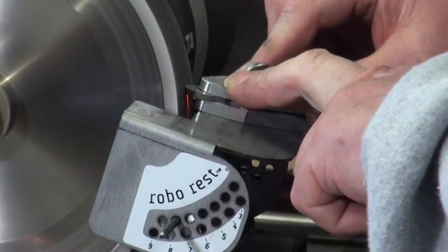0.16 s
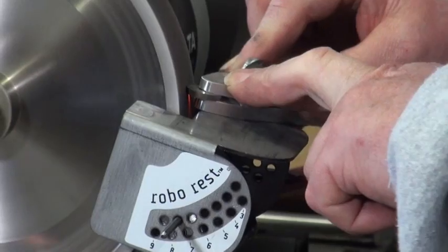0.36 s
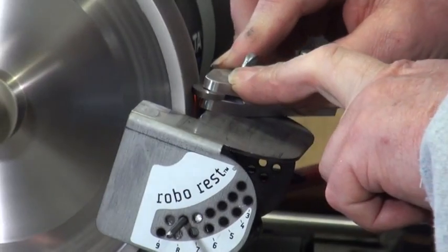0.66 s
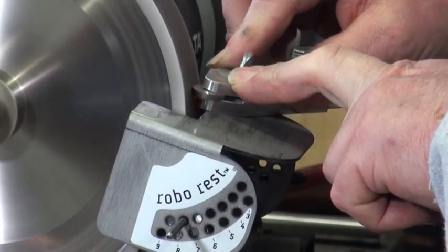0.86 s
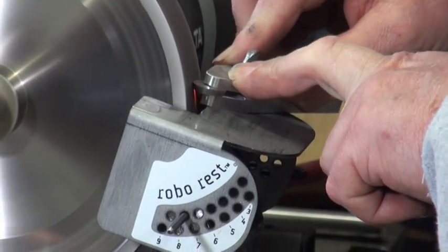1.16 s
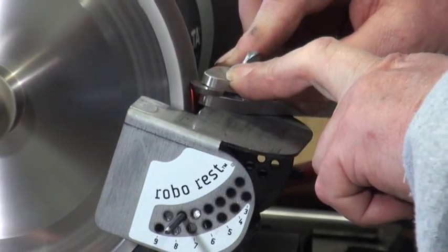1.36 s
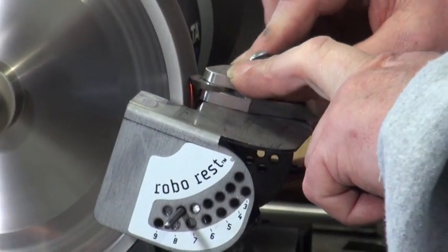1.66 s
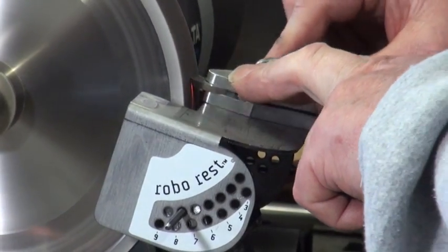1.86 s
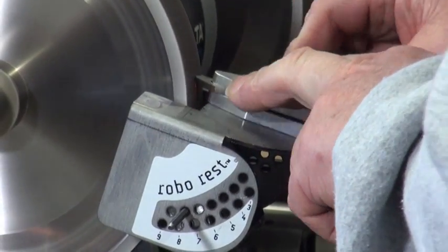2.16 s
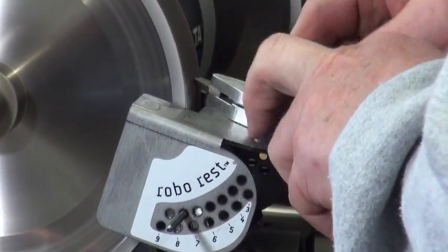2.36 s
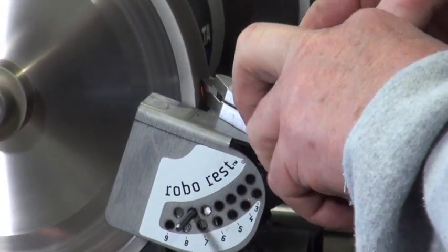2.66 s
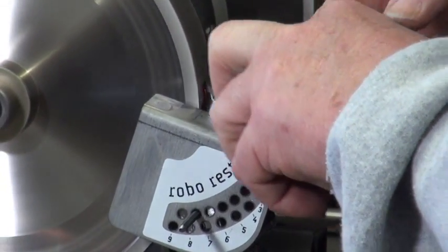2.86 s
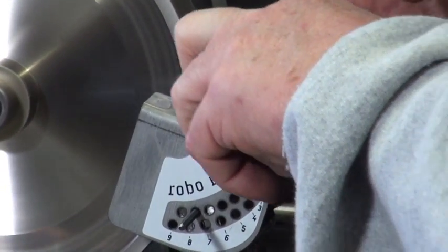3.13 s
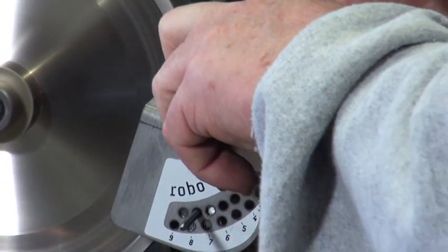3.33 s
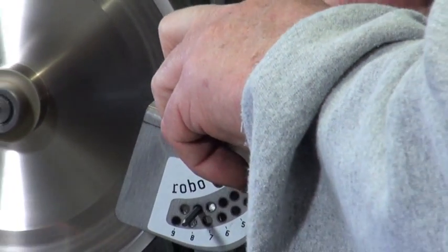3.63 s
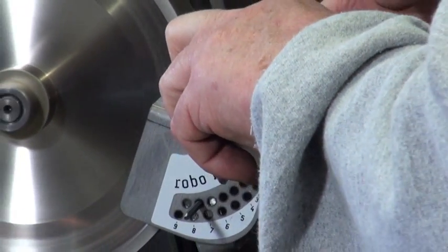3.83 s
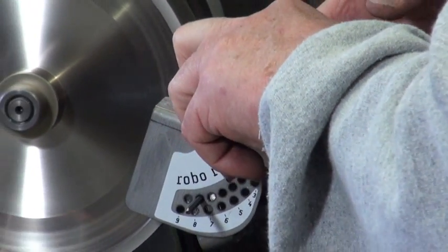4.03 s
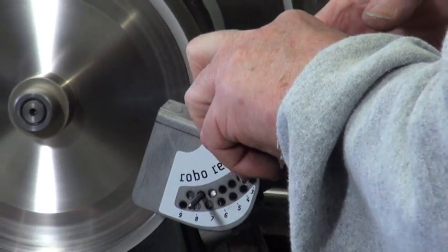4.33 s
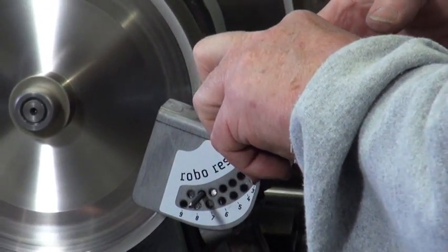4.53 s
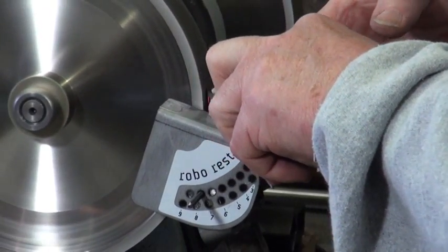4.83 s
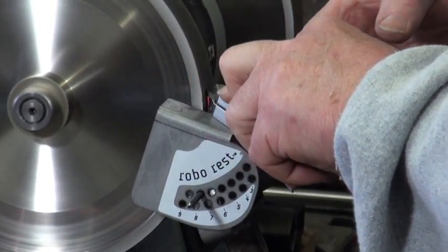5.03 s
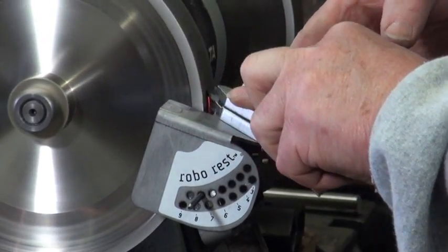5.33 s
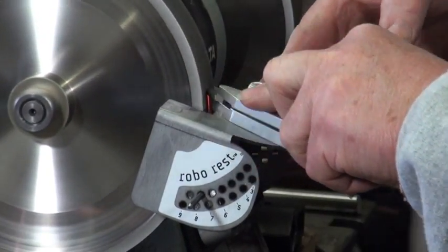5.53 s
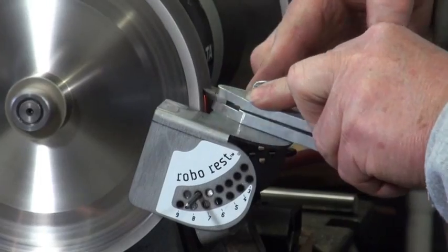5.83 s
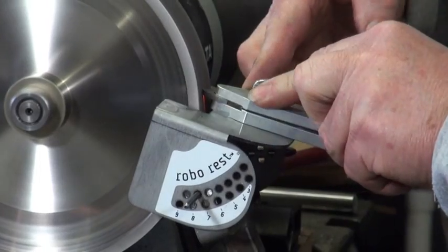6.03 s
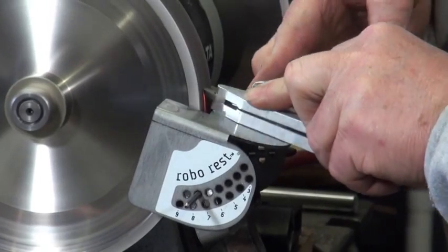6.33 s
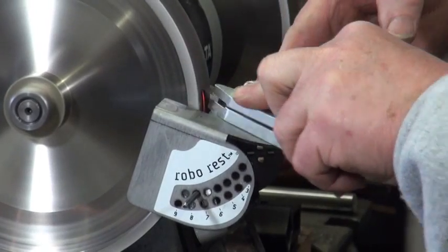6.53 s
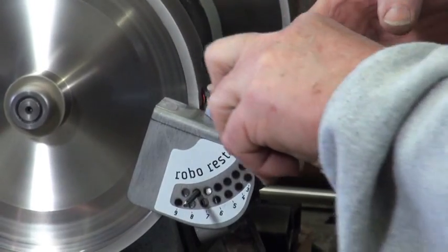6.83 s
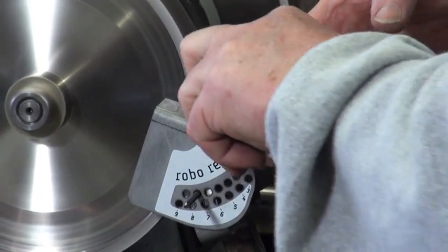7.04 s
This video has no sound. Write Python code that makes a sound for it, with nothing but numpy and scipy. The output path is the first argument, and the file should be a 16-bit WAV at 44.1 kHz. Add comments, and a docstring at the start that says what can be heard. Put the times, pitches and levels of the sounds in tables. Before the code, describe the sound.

A small steel cutter rasps on a spinning bench grinder wheel, buzzing, hissing and squealing, twice biting into a harsh shriek over motor hum.

```python
"""The edge of a small steel cutter rasps on a bench grinder wheel; it sits in a holder that is swung to and fro.
Periodic excitation: much of the grit repeats from turn to turn, so the rasp buzzes at the wheel's rate.
Modes of cutter and holder ring, squeal and slide as the contact rolls; twice the edge bites harder and shrieks.
Behind it the motor hums in steady lines and the wheel stirs the air, a broadband rush; the workshop reflects all.
A gain control, triggered by loud passages, ducks the whole sound and recovers slowly."""
import sys
import numpy as np
from scipy import signal
from scipy.fft import rfft, irfft, next_fast_len
from scipy.io import wavfile
from scipy.ndimage import uniform_filter1d, map_coordinates

SR = 44100
rng = np.random.default_rng(int(sys.argv[2]) if len(sys.argv) > 2 else 0)


def log_audio(samples):
    """Write samples as a 16-bit WAV file to the path given in sys.argv[1]."""
    # one column per channel
    frames = np.atleast_2d(samples).T
    # limit to full scale, then quantise
    limited = np.clip(frames, -1, 1)
    pcm = np.round(limited * 32767).astype(np.int16)
    wavfile.write(sys.argv[1], SR, pcm)


N = 317245
TIME = np.arange(N) / SR  # s

# sharp modes of cutter and holder: f/Hz, level relative to the rasp/dB before a common trim
LOW_MODES = [(2697, -24.5), (2982, -21), (3773, -11.5), (4032, -11), (4780, -11), (5588, -18),
             (5770, -26.5), (6782, -9.5), (7127, -10.5), (7424, -22), (7705, -12), (8495, -20.5)]
# the edge bites into the wheel: start/s, digging in/s, easing off/s, jump of the rasp/dB, jump of the hiss/dB,
# shriek f/Hz, shriek level/dB
BITES = [(0.895, 0.19, 0.14, 4, 7, 10100, -28), (3.39, 0.24, 0.57, 8, 5.5, 7500, -35)]


def amp(db):
    """Amplitude ratio of a level in decibels."""
    return 10 ** (np.asarray(db) / 20)


def unit(x):
    """Normalisation to rms 1."""
    return x / np.sqrt(np.mean(x ** 2) + 1e-20)


def along(points, hz):
    """Interpolation of (f/Hz, value) points on a logarithmic frequency axis."""
    f, values = np.transpose(points)
    return np.interp(np.log(hz + 1), np.log(f), values)


def curves(rows):
    """Linear interpolation in time: one value per sample for each column after t/s."""
    t, *columns = np.transpose(rows)
    return [np.interp(TIME, t, column) for column in columns]


def wobble(rate, count=N):
    """Slow random modulation: a smooth curve of count samples through rate random knots a second."""
    knots = rng.standard_normal(int(count * rate / SR) + 4)
    coarse = TIME[:count:100]
    smooth = map_coordinates(knots, [coarse * rate])
    return np.interp(TIME[:count], coarse, smooth)


def filtered(x, response):
    """Linear filtering: the spectrum of x is multiplied by a response of frequency."""
    size = next_fast_len(N + 8192)
    gain = response(np.fft.rfftfreq(size, 1 / SR))
    return irfft(rfft(x, size) * gain, size)[..., :N]


def coloured(x, spectrum):
    """Spectral shaping of x by (f/Hz, dB) points, falling away beyond their ends, at rms 1."""
    closed = [(spectrum[0][0] / 2, -90), *spectrum, (spectrum[-1][0] * 2, -90)]
    return unit(filtered(x, lambda hz: amp(along(closed, hz))))


def ring(drive, hz, width_hz):
    """Forced resonance that follows the curve hz, its slow level held at rms 1."""
    carrier = np.exp(2j * np.pi * np.cumsum(hz) / SR)
    envelope = drive / carrier  # shifts the resonance to zero frequency
    for band_hz in (width_hz, 6 * width_hz):  # a peak with steep skirts
        envelope = signal.lfilter([1], [1, -np.exp(-np.pi * band_hz / SR)], envelope)
    power = np.abs(uniform_filter1d(np.abs(envelope) ** 2, size=2800))
    return (envelope * carrier).real * np.sqrt(2 / (power + 1e-20))


def tone(hz, drift, count=N):
    """Sinusoidal vibration of rms 1 whose phase drifts at random by some radians."""
    phase = 2 * np.pi * (hz * TIME[:count] + rng.random())
    return np.sqrt(2) * np.sin(phase + drift * wobble(9, count=count))


def swell(s, half):
    """Transient envelope: the samples around time s, and a flat-topped bell curve over them."""
    span = slice(max(0, int((s - 2 * half) * SR)), int((s + 2 * half) * SR))
    return span, np.exp(-np.abs((TIME[span] - s) / half) ** 3)


def grit(uneven_db=0.5):
    """Nearly periodic excitation: a ring of grains presses on the edge once a turn and changes a little each time."""
    # the wheel: t/s, rate/(turns per s)
    speed = [(0, 47.35), (1.9, 47.35), (3.6, 47.1), (4.6, 47.07), (7.19, 47.05)]
    # the track under the edge: t/s, correlation of the grit with the turn before (0-1, capped below)
    repeat = [(0, 0.85), (1.9, 0.98), (2.4, 0.72), (3.6, 0.74), (4.4, 0.86), (5.3, 0.86), (6.1, 0.63),
              (7.19, 0.93)]
    angle = np.cumsum(curves(speed)[0]) / SR  # turns
    track = rng.standard_normal((int(angle[-1]) + 2, 940))  # turns by grains
    kept = np.clip(np.interp(np.arange(len(track)), angle, curves(repeat)[0]), 0, .97)
    for turn in range(1, len(track)):
        fresh = np.sqrt(1 - kept[turn] ** 2) * track[turn]
        track[turn] = kept[turn] * track[turn - 1] + fresh
    force = map_coordinates(track.ravel(), [angle * track.shape[1]])
    # high spots on the rim press harder as they come round
    rim = sum(np.cos(2 * np.pi * (k * angle + rng.random())) for k in range(1, 7))
    return force * amp(uneven_db * unit(rim))


def bite_corners(start, dig, ease, attack_s=0.026):
    """Stages of a bite in s: contact, full pressure, end of digging in, release."""
    return start + np.cumsum([0, attack_s, dig, ease])


def effort(rasp_dig_db=4):
    """Contact pressure sets the levels/dB: a bite lifts rasp and hiss at once, then the rasp builds up further."""
    # the scrape comes and goes as the holder is swung: t/s, relative level of the scrape/dB
    swing = [(0, -46.5), (0.3, -43.5), (1.15, -43.5), (2.05, -49), (2.35, -60), (3.35, -54), (3.67, -46),
             (3.95, -51.5), (4.3, -48.5), (5.35, -45), (5.95, -53.5), (6.6, -54), (7, -46.5), (7.19, -48)]
    # steady grinding under the bites: t/s, relative level of the rasp/dB, relative level of the hiss/dB
    steady = [(0, -40, -42.5), (0.55, -39.5, -41), (0.75, -37.5, -38.5), (0.88, -39.5, -37.5),
              (1.35, -39.5, -35), (1.7, -40.5, -45), (2.05, -42, -41.5), (2.38, -44, -46.5),
              (2.65, -43, -41), (2.85, -41.5, -39.5), (3.08, -43.5, -39.5), (3.35, -46.5, -36.5),
              (4.05, -41, -38), (4.25, -39.5, -44), (4.85, -41.5, -43.5), (5.4, -39, -44),
              (6.2, -39, -45.5), (7.19, -40, -44.5)]
    scrape_db, = curves(swing)
    rasp_db, hiss_db = curves(steady)
    for start, dig, ease, rasp_jump_db, hiss_jump_db, _, _ in BITES:
        corners = bite_corners(start, dig, ease)
        rasp_db = rasp_db + np.interp(TIME, corners, [0, rasp_jump_db, rasp_jump_db + rasp_dig_db, 0])
        hiss_db = hiss_db + np.interp(TIME, corners, [0, hiss_jump_db, hiss_jump_db, 0])
    return scrape_db, rasp_db, hiss_db


def minor_modes(force, depth_db=2):
    """Modal overlap: countless weak resonances ripple the spectrum, and shift slowly as the grip changes."""
    z = signal.stft(force, nperseg=1024)[2]
    ripple = uniform_filter1d(rng.standard_normal(z.shape), size=3, axis=0)  # over frequency
    for _ in range(2):
        ripple = uniform_filter1d(ripple, size=45, axis=1)  # over time
    return unit(signal.istft(z * amp(depth_db * unit(ripple)), nperseg=1024)[1][:N])


def grinding(force, levels, low_wander_db=4.5, high_wander_db=5.0, drift=1.0, damped_width_hz=16,
             scrape_trim_db=3.2, rasp_trim_db=0.44, hiss_trim_db=0.9,
             low_modes_db=-4, high_modes_db=-4.0, fizz_db=-49):
    """Forced vibration: the grit scrapes the steel and keeps all its modes ringing."""
    # spectra of the layers, each then scaled to rms 1: f/Hz, relative level per Hz/dB
    scrape = [(700, -42), (1300, -12), (1750, 6), (1950, -1), (2150, 5.5), (2550, 4), (2900, 3), (3400, 5),
              (4300, -23), (5000, -17), (6000, -16)]
    rasp = [(3000, -38), (3700, 3), (4500, 1.5), (5100, 5), (5700, 3.5), (6100, 5.5), (6900, 7), (7600, 6),
            (8200, -2.5), (8500, 6), (9000, -5), (9300, -12), (11000, -26)]
    hiss = [(8000, -3), (9400, -2.5), (10300, 4), (10900, 4), (11150, 8), (11450, 1.5), (11800, 6.5),
            (12700, 8), (13250, -5.5), (13700, -5), (14400, -25), (15500, -11)]
    fizz = [(12500, -19), (13400, 17), (13800, -7), (14400, 0), (14800, -1), (15200, 3), (15600, 7)]
    # more damped modes of the small cutter: f/Hz, level relative to the hiss/dB before a common trim
    high_modes = [(9755, -13), (9991, -12), (10196, -10), (10697, -9), (10885, -8), (11950, -14),
                  (12177, -6), (13048, -4.5), (13275, -8), (14056, -16), (14393, -6.5), (15719, -16)]
    scrape_db, rasp_db, hiss_db = levels
    out = amp(scrape_db + scrape_trim_db) * coloured(force, scrape)
    out += amp(rasp_db + rasp_trim_db) * coloured(force, rasp)
    chips = force + 0.32 * rng.standard_normal(N)  # flying chips never repeat
    out += amp(hiss_db + hiss_trim_db) * coloured(chips, hiss)
    out += amp(fizz_db) * coloured(chips, fizz)
    for hz, db in LOW_MODES:  # these ring on smoothly from turn to turn
        background = amp(rasp_db + low_modes_db + db + low_wander_db * wobble(6.8))
        out += singing(hz, background) * tone(hz, drift)
    for hz, db in high_modes:  # these tremble with the grit
        strength = amp(hiss_db + high_modes_db + db + high_wander_db * wobble(8.8))
        out += strength * ring(force, np.full(N, hz), damped_width_hz)
    return out


def singing(mode_hz, background, uneven_db=1.5, neighbour_hz=320, neighbour_db=-17.5):
    """Modal coupling: a mode swells unevenly when it squeals, and more softly when a close neighbour does."""
    # a mode catches and squeals: t/s, half length/s, f/Hz, level/dB
    squeals = [(0.105, 0.19, 5588, -41), (0.733, 0.4, 4780, -38.5), (1.168, 0.06, 7705, -34),
               (1.198, 0.13, 3773, -38.5), (1.2, 0.14, 4032, -42.5), (2.404, 0.29, 4032, -46.5),
               (3.276, 0.22, 8495, -49.5), (3.424, 0.19, 4032, -34.5), (3.81, 0.18, 3773, -24.5),
               (3.85, 0.32, 6782, -37), (4.04, 0.08, 7705, -36), (4.147, 0.17, 5770, -44),
               (4.38, 0.19, 3773, -36.5), (5.956, 0.15, 3773, -36.5), (6.361, 0.058, 4032, -33),
               (6.462, 0.12, 7127, -37), (6.53, 0.085, 4032, -39), (7.1, 0.25, 7424, -43.5),
               (7.15, 0.18, 3773, -47)]
    pitches = np.array(LOW_MODES)[:, 0]
    power = background ** 2
    waver_db = uneven_db * wobble(25)
    for s, half, hz, db in squeals:
        nearest_hz = pitches[np.argmin(np.abs(pitches - hz))]
        apart_hz = abs(nearest_hz - mode_hz)
        if apart_hz < neighbour_hz:
            span, bell = swell(s, half)
            squeal_db = db + neighbour_db * (apart_hz > 0) + waver_db[span]
            power[span] += (amp(squeal_db) * bell) ** 2
    return np.sqrt(power)


def shrieks(force, width_hz=430):
    """Broad resonance under pressure: as it digs in, the edge shrieks at a pitch set by the part that touches."""
    out = np.zeros(N)
    for start, dig, ease, _, _, hz, db in BITES:
        pressure = np.interp(TIME, bite_corners(start, dig, ease), [0, 1, 1, 0])
        out += amp(db) * pressure ** 2 * ring(force, np.full(N, hz), width_hz)
    return out


def sliding(force, levels, sharpness=75, roam=0.022, wander_db=2.5, loose=0.91):
    """Varying contact stiffness: as the edge rolls, its damped resonances slide and now and then squeak."""
    # resonances that follow the scrape, the rasp and the hiss, one list each:
    # f/Hz, width/Hz, level relative to that layer's untrimmed level/dB, swell/(dB per dB)
    damped = [
        [(2980, 120, -8.5, 0.9), (4680, 240, -5.5, 1.0)],
        [(5660, 220, -18, 2.5), (7650, 190, -12, 1.56)],
        [(8830, 190, -19, 1.74), (10100, 450, -17, 2.05)],
    ]
    # hoarse squeaks as the edge rolls over: t/s, half length/s, f/Hz, slide/(Hz per s), level/dB
    squeaks = [(0.15, 0.29, 4400, -300, -42.5), (0.2, 0.14, 3134, -200, -47),
               (0.297, 0.36, 5180, -2200, -50), (1.1, 0.23, 2860, 48, -40.5), (1.72, 0.27, 2980, 100, -45),
               (1.88, 0.25, 4210, 895, -45.5), (1.95, 0.46, 4855, 200, -45), (2.45, 0.37, 1048, 22, -47.5),
               (2.847, 0.4, 10370, 450, -41), (2.968, 0.076, 4730, -100, -43), (5.753, 0.21, 4200, 18, -45),
               (6.03, 0.17, 4730, -51, -41.5), (6.66, 0.15, 4250, 1500, -43)]
    out = np.zeros(N)
    drive = force + loose * rng.standard_normal(N)  # loose grit roughens the contact
    for level_db, resonances in zip(levels, damped):
        usual_db = level_db.mean()
        for hz, width_hz, db, growth in resonances:  # growth above 1 stands out of its layer in a hard bite
            layer_db = usual_db + growth * (level_db - usual_db)
            strength = amp(layer_db + db + wander_db * wobble(3.22))
            out += strength * ring(drive, hz * (1 + roam * wobble(2.4)), width_hz)
    for s, half, hz, slide, db in squeaks:
        span, bell = swell(s, half)
        pitch_hz = hz + slide * (TIME[span] - s)
        out[span] += amp(db) * bell * ring(drive[span], pitch_hz, hz / sharpness)
    return out


def machine(air_db=2, hum_db=-2.0, flutter_db=1.74, drift=0.079, shading=1.65):
    """Turbulence and line spectrum: air rushes round the wheel over the slightly unsteady hum of the motor."""
    # the running machine, softer while the arm is in front of it: t/s, relative level of the air/dB
    rush = [(0, -43.5), (2.4, -44), (2.9, -45), (4.3, -45), (6, -42.5), (7.19, -44.5)]
    # spectrum of the air, then scaled to rms 1: f/Hz, relative level per Hz/dB
    air_spectrum = [(25, -42), (70, -20.5), (130, -16), (175, -10.5), (250, -12), (300, -0.5), (380, -1.5),
                    (600, 2.5), (690, -5.5), (820, 0), (920, -1), (1040, 2.5), (1170, -4.5), (1600, -4.5),
                    (2100, -14)]
    # motor lines, mostly multiples of the mains: f/Hz, relative level/dB
    hum_lines = [(47.3, -66.5), (95, -80), (120, -71), (378, -53.5), (420, -56.5), (480, -50.5), (574, -62),
                 (600, -56.5), (625, -63), (660, -58), (720, -49), (780, -53), (840, -50.5), (960, -67),
                 (1020, -50), (1540, -56)]
    rush_db, = curves(rush)
    air = amp(air_db + rush_db) * coloured(rng.standard_normal(N), air_spectrum)
    hum = sum(amp(db + flutter_db * wobble(2.62)) * tone(hz, drift) for hz, db in hum_lines)
    shaded_db = shading * (rush_db - rush_db.mean())  # the hum varies more than the air
    return air + amp(hum_db + shaded_db) * hum


def walls(x):
    """Diffuse reverberation: convolution with a noise tail whose decay time depends on frequency."""
    # the workshop: f/Hz, time to decay by 60 dB/s
    decay = [(200, 0.13), (2000, 0.037), (12000, 0.19)]
    hz, t, z = signal.stft(rng.standard_normal(SR // 3), SR, nperseg=256)
    fading = amp(-60 * t / along(decay, hz)[:, None])
    tail = signal.istft(z * fading, SR, nperseg=256)[1]
    return signal.fftconvolve(x, tail / np.linalg.norm(tail))[:N]


def scene():
    """Superposition: the grinder stands straight ahead; diffuse reflections make the two sides differ a little."""
    # the two sides: f/Hz, level of the side signal relative to the middle/dB
    width = [(40, -46), (90, -19), (180, -20), (400, -14), (700, -9.5), (1400, -6), (3000, -11.5),
             (5000, -14), (10000, -12), (12000, -33.5)]
    force, levels = grit(), effort()
    rippled = minor_modes(force)
    direct = grinding(rippled, levels) + shrieks(rippled) + sliding(force, levels) + machine()
    side = filtered(walls(direct), lambda hz: amp(along(width, hz)))
    return np.array([direct + side, direct - side])


def record(dry, threshold_db=-29, share=0.43, recovery_db_per_s=3.5, top_hz=15780):
    """Dynamic compression: a share of the excess level is cut, with slow recovery; a band limit follows."""
    power = np.abs(uniform_filter1d(np.mean(dry ** 2, axis=0), size=1300))
    excess_db = np.maximum(10 * np.log10(power + 1e-20) - threshold_db, 0)
    recovery_db = recovery_db_per_s * TIME
    # each cut lasts until a larger one comes, less what has been recovered
    cut_db = np.maximum.accumulate(share * excess_db + recovery_db) - recovery_db
    return filtered(dry * amp(-cut_db), lambda hz: hz < top_hz)


dry = scene()
out = record(dry)
log_audio(out)
```